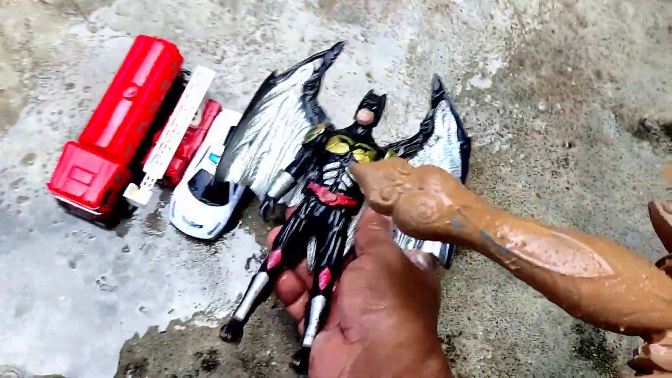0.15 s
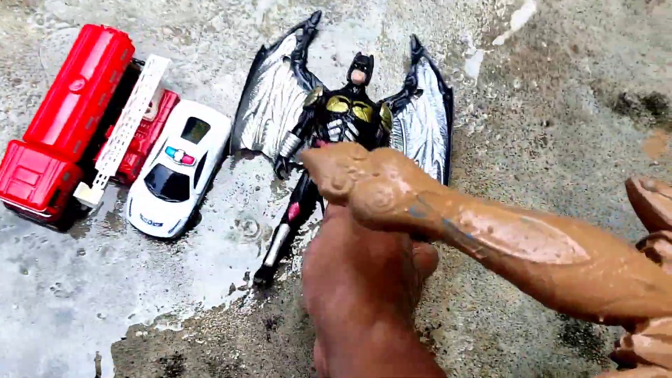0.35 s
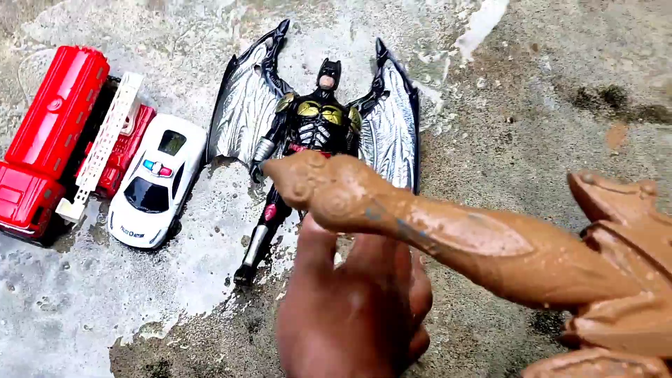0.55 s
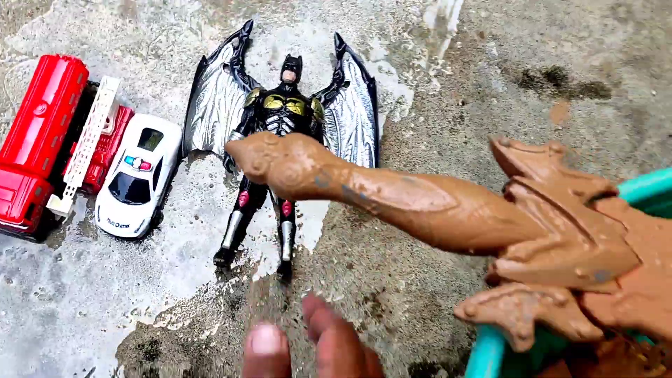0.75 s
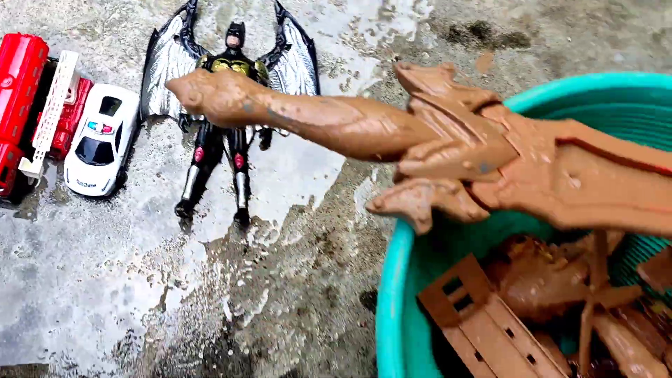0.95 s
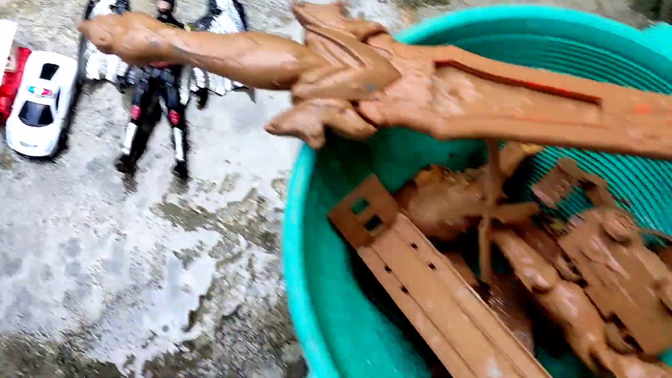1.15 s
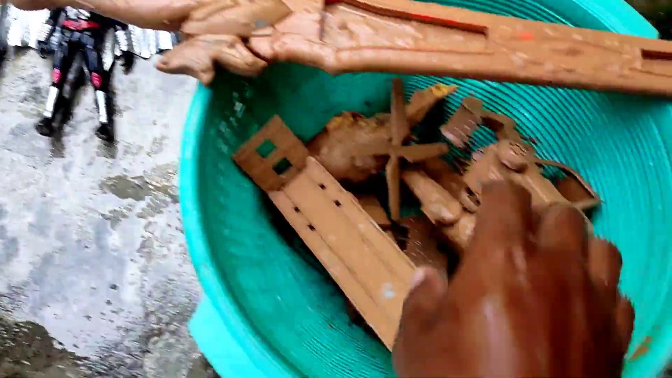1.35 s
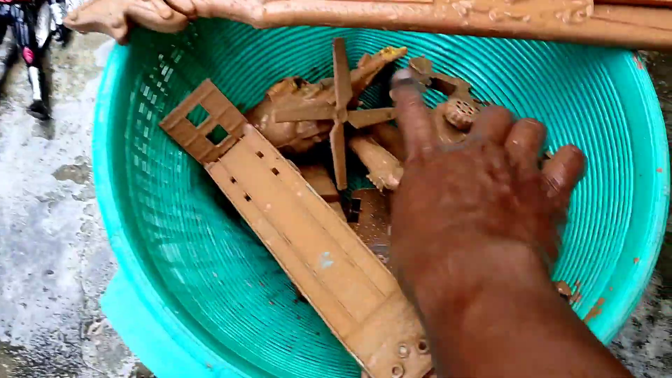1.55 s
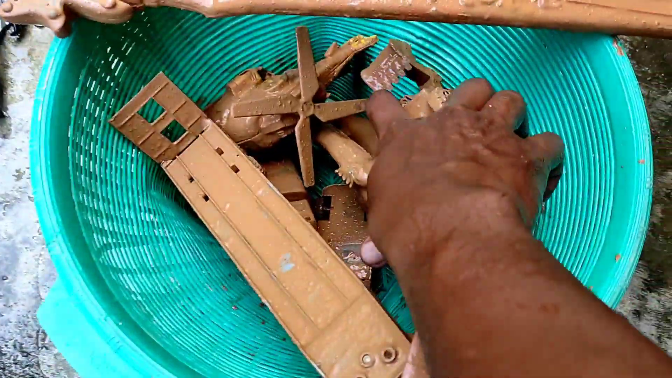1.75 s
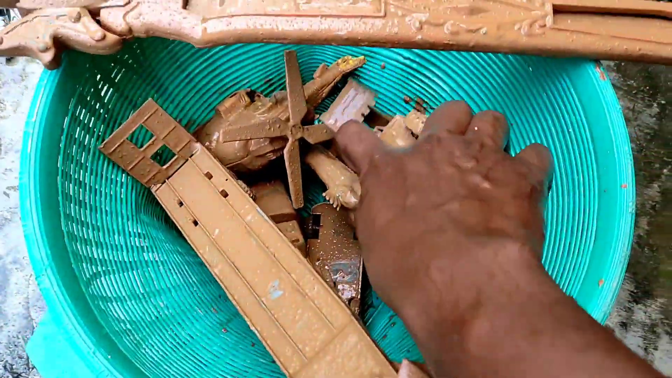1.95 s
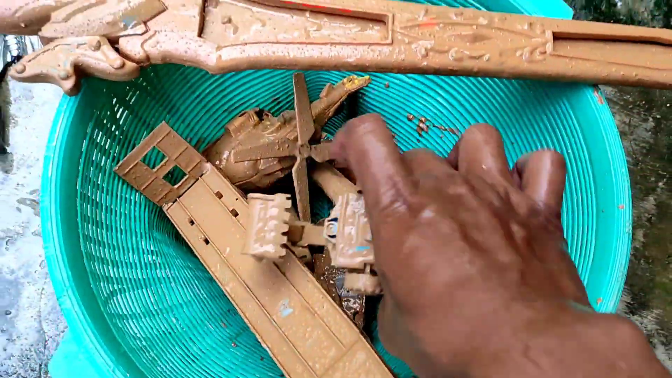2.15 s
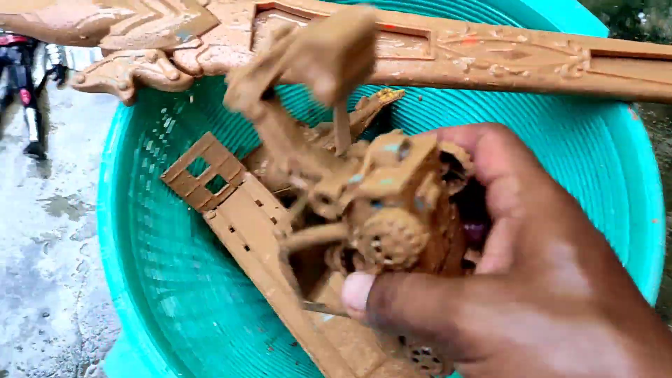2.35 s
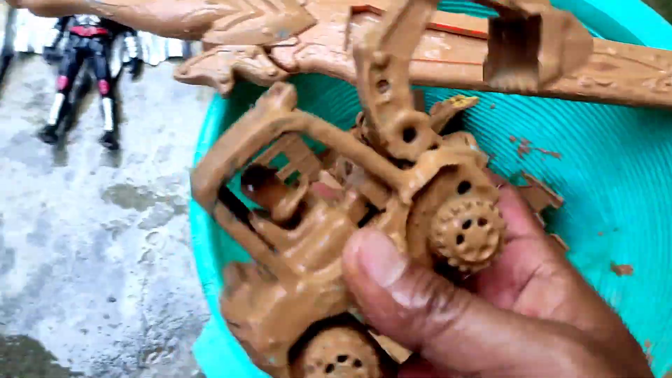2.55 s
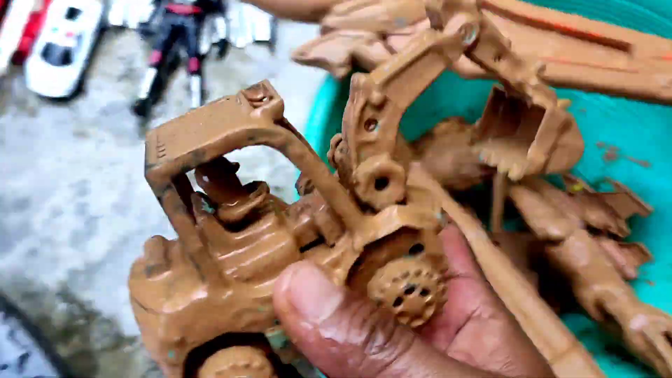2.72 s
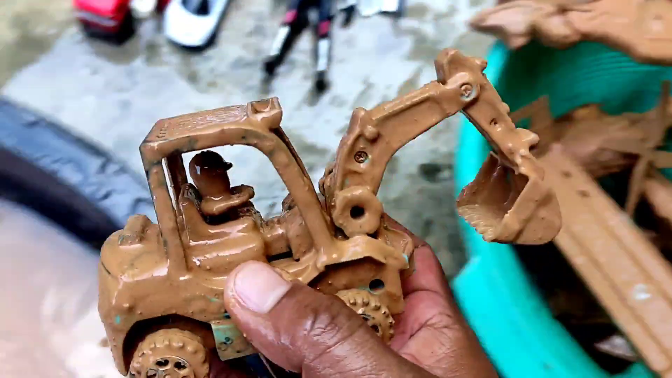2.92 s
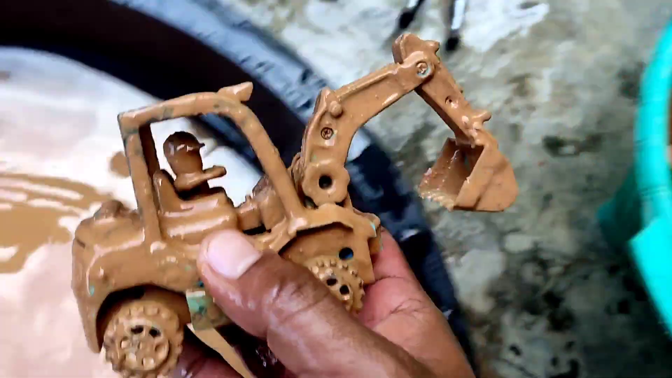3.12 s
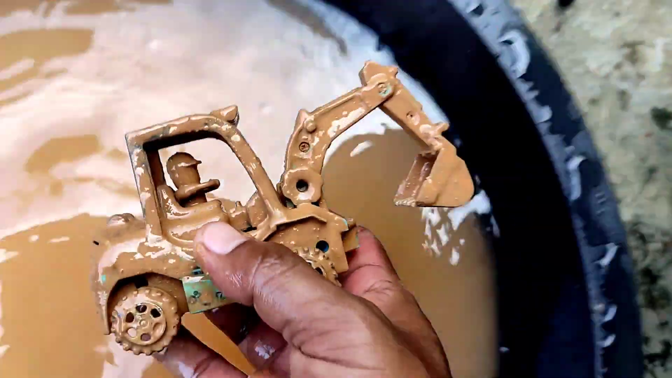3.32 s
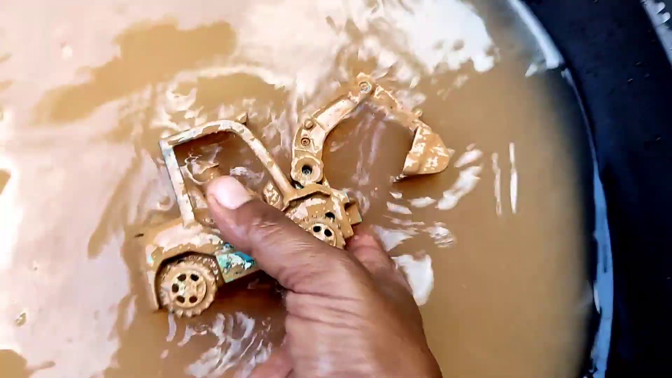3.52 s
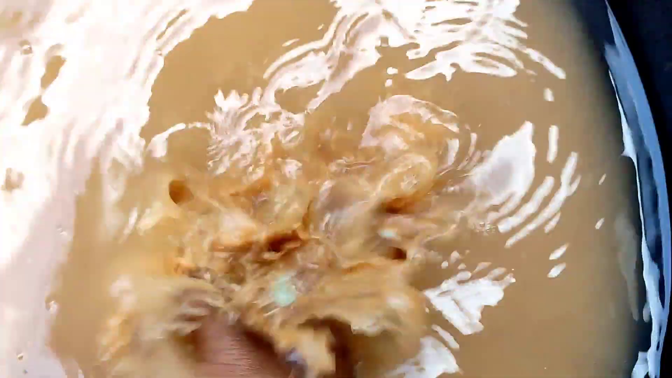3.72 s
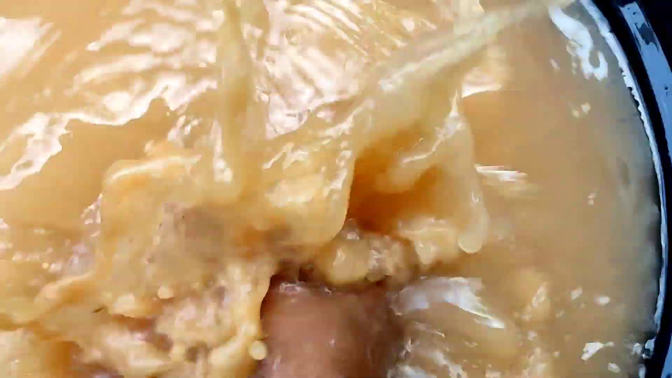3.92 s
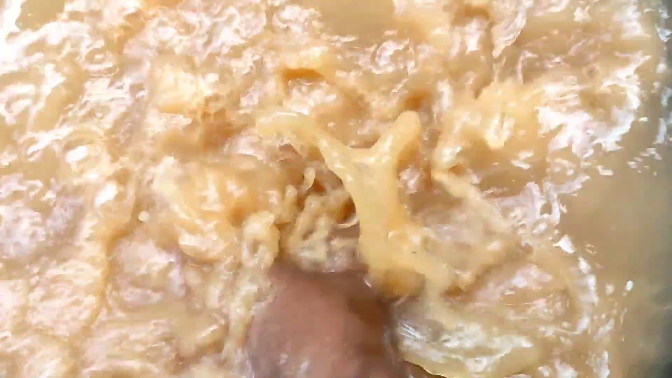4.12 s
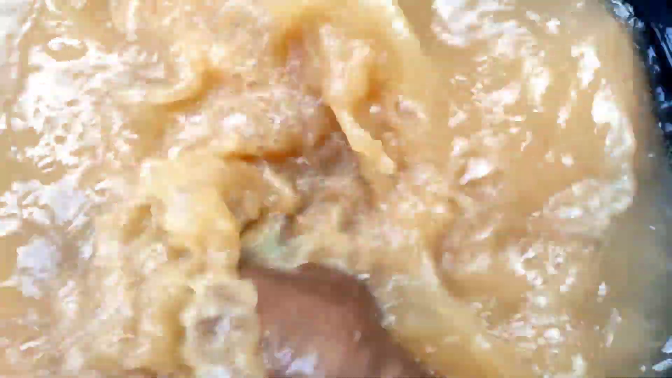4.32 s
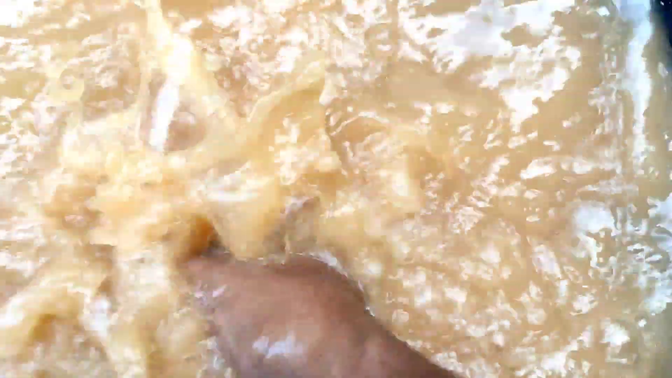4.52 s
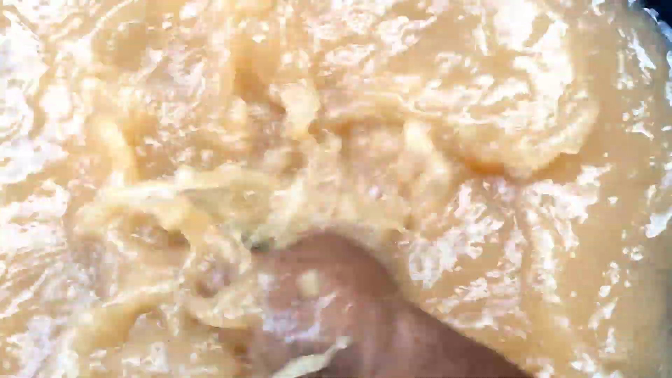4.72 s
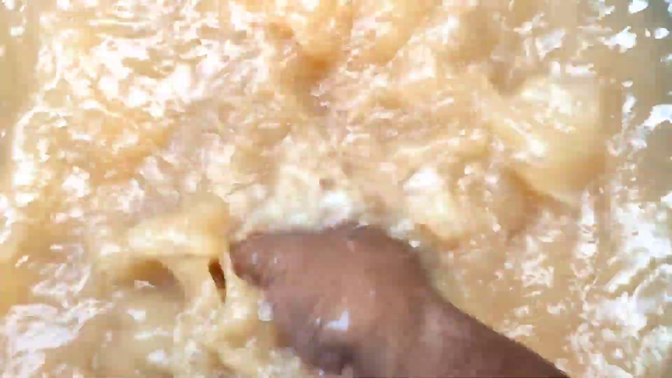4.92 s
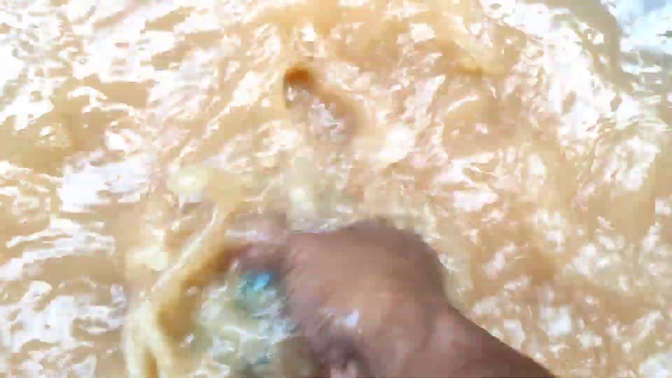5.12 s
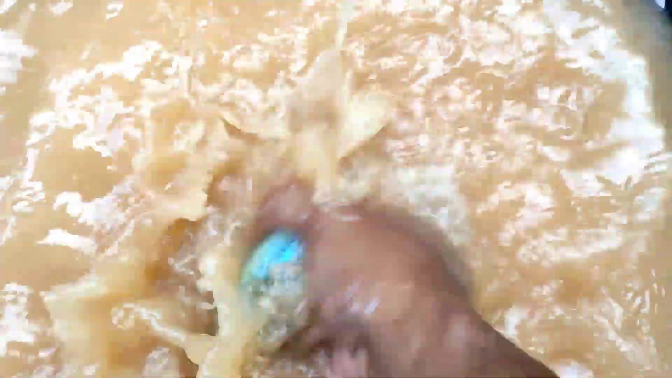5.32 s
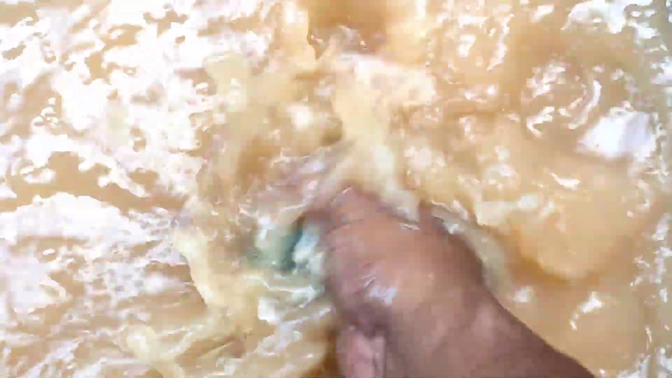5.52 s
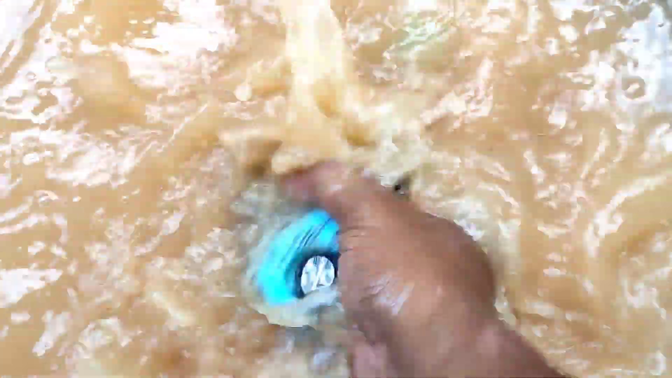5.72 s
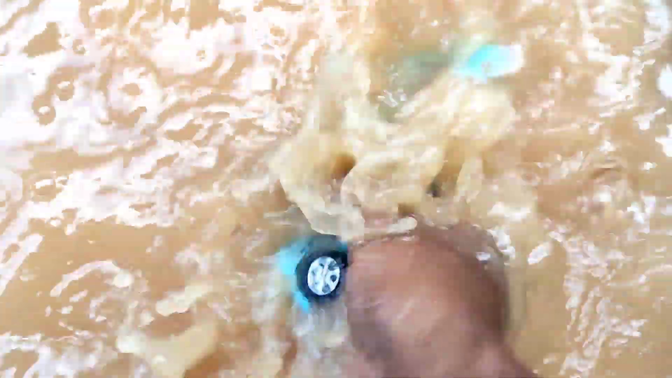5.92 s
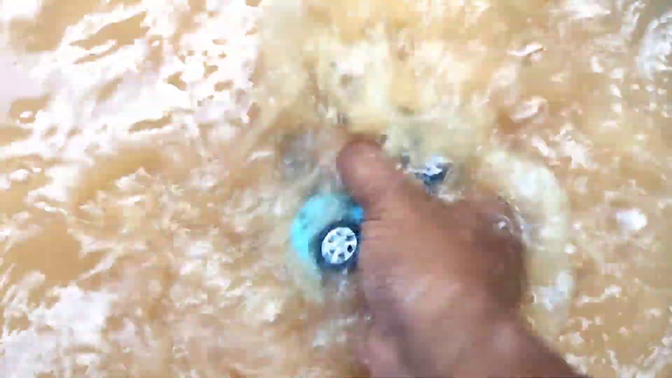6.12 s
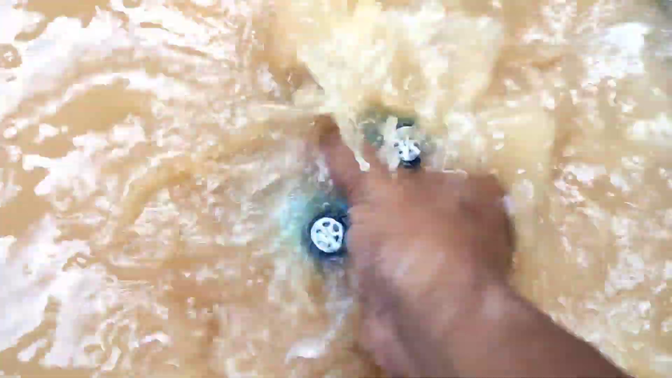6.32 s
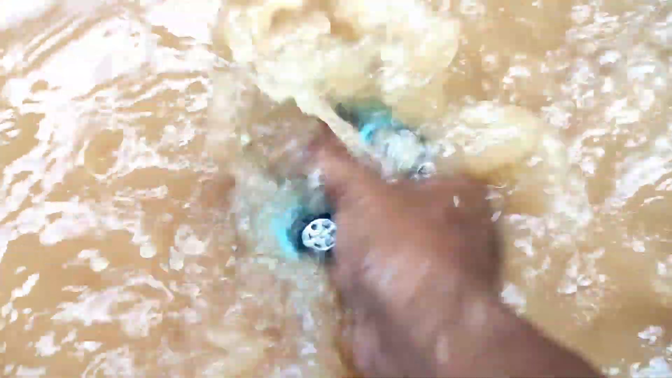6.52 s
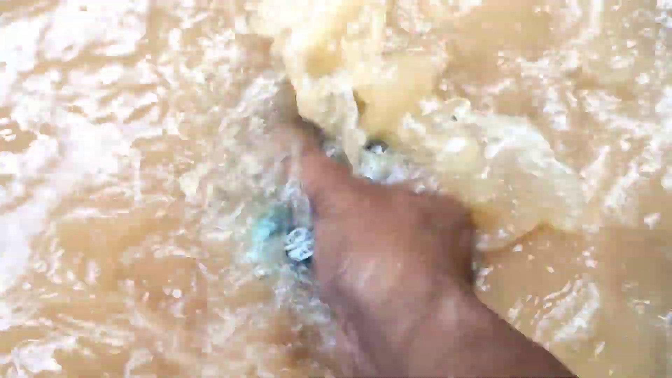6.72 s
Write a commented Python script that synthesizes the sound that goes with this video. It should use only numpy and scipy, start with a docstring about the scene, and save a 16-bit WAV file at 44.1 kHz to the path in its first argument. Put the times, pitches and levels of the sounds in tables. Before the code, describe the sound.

A faint, distant outdoor background runs throughout, with everything else close to the microphone. At the start a plastic toy scrapes softly over concrete, drops with a sharp, hollow crack at about 0.4 seconds and rocks briefly to rest. Low handling rumble comes and goes, and from 1.2 to 1.5 seconds something rubs against the microphone with a hiss and a squeak. From about 1.8 to 2.8 seconds a hand rummages in a plastic basket, toys sliding over each other with light, hollow knocks. Around 3 seconds a faint hum of air in a basin comes in, and a few drips fall near 3.6 seconds. At 3.8 seconds a toy is plunged into the water and scrubbed to and fro. Quick, uneven strokes slosh, slap the surface, gurgle with bubbles and throw spray, loud and continuous until the end, near 6.8 seconds.

```python
"""Plastic toys are washed outdoors, close to a phone. Over the distant yard, one toy is dragged along the
concrete, drops and rocks, its hollow shell ringing. The grip on the phone rumbles, something rubs on its
case with a hiss and a squeak, and a hand rummages in a plastic basket. The basin's air hums in, a few
drips fall, and at 3.8 s a muddy toy is plunged in and scrubbed to and fro: the strokes trap ringing air
bubbles, slap the surface and throw spray."""
import sys
import numpy as np
from scipy import signal
from scipy.fft import rfft, irfft
from scipy.io import wavfile
from scipy.ndimage import uniform_filter1d

SR = 44100
rng = np.random.default_rng(int(sys.argv[2]) if len(sys.argv) > 2 else 0)


def inscribe(sig):
    """Save sig as 16-bit PCM at rate SR to the path in sys.argv[1].

    A 1-D sig is mono; a 2-D sig holds one channel per row.
    Samples are clipped to [-1, 1] before scaling.
    """
    pcm = np.round(np.clip(np.atleast_2d(sig).T, -1, 1) * 32767)
    wavfile.write(sys.argv[1], SR, pcm.astype(np.int16))


N = 298116
T = np.arange(N) / SR
HZ = np.maximum(np.fft.rfftfreq(2 * N, 1 / SR), 1)

# EQ curves that colour the layers. Each row: frequency in Hz, relative level in dB.
YARD_EQ = [(40, -38), (200, -9), (275, 1), (350, -5.5), (500, -12), (620, -14), (850, -15.5), (1600, -20),
           (3000, -21.5), (6300, -24), (7400, -34), (9200, -28.5), (11500, -34.5), (15000, -34)]
DRAG_EQ = [(100, -20), (280, 16), (600, 4), (1600, -3), (3200, -4), (5000, -20), (15000, -33)]
CRACK_EQ = [(150, -21), (350, 0.5), (900, 6.5), (1400, -2), (3000, 9.5), (6000, -5), (9000, -36),
            (15000, -30)]
RUMBLE_EQ = [(20, -10), (50, -12), (100, 5), (170, 4), (260, -8), (500, -32), (1000, -56)]
HISS_EQ = [(400, -10), (1000, 4.5), (1600, 5.5), (2300, 4.5), (4000, -0.5), (7000, -7), (10000, -8.5),
           (15000, -10.5)]
THUD_EQ = [(170, -29), (400, -1.5), (750, -3.5), (1200, -4), (2000, -11.5), (3500, -15.5), (9000, -27),
           (15000, -27)]
SPRAY_EQ = [(900, -10.5), (2500, 1.5), (4000, -1), (5800, -5), (6600, -3.5), (7300, -10), (9000, -5),
            (10300, -7.5), (11500, -9.5), (12500, -8), (15500, -14.5)]
SPLASH_EQ = [(300, -23.5), (600, -2.5), (800, -12), (920, -12.5), (1090, 0), (1300, -3), (1700, -1),
             (2000, -5.5), (2500, -1.5), (3300, -34), (6000, -33)]
CHURN_EQ = [(50, -46), (170, -35), (220, -22.5), (275, -1.5), (330, -8), (392, 5.5), (470, 0), (750, -2),
            (1000, -4), (2000, -72.5)]
# Friction moves. Each row: time of full speed in seconds, build-up in seconds, level in dB.
DRAG_MOVES = [(.16, .12, -40.5), (.42, 0.025, -42)]  # toy along the ground
GRIP_MOVES = [(1.08, 0.056, -42.5), (1.74, 0.17, -40.5), (2.66, 0.045, -44), (2.83, 0.024, -37.5),
              (2.98, .04, -39), (4.0, .08, -41.5), (5.95, 0.13, -40.5), (6.74, 0.093, -44)]  # fingers on the phone
RUMMAGE_MOVES = [(1.76, 0.044, -43), (1.94, 0.028, -39), (2.03, 0.061, -34), (2.095, 0.011, -36),
                 (2.165, 0.017, -32.5), (2.215, 0.044, -31), (2.34, .03, -43), (2.48, 0.17, -45.5)]  # toy over toy
# Plastic hits. Each row: start in seconds, level in dB, treble offset in dB, leftward lean in dB
# (halved in the mix).
CONCRETE_HITS = [(0.358, -24, -16, 0), (0.367, -4.5, -7, -5), (0.372, -7, -23, -1),
                 (0.383, -10.5, -16, -11), (0.408, -27, -16, -2), (0.470, -14, -19, -6),
                 (0.474, -14, -22, -12), (0.507, -17, -31, -12), (0.545, -36, -22, 15),
                 (0.580, -25, -27, 0)]
BASKET_HITS = [(2.091, -21.5, -22, -4), (2.186, -26.5, -23, -17), (2.307, -23, -39, 2),
               (2.557, -23.5, -7, 15), (2.611, -33.5, -3.5, 4), (2.686, -23.5, -30, -7),
               (2.722, -28, -15, -4), (2.770, -32, -24, 0), (2.778, -13, -44, 0)]
# Modes of the hollow shells. Each row: pitch in Hz, level in dB, time to fall 60 dB in seconds.
DROPPED_TOY_MODES = [(407, -9, 0.22), (1170, -7, 0.062), (1450, 8, 0.025), (1620, -3, 0.07),
                     (2980, 4, 0.029), (3500, 2, 0.033), (4270, -26, 0.044)]
BASKET_TOY_MODES = [(366, -14, 0.06), (706, -2.5, 0.052), (755, 0, 0.032), (1070, 2, 0.026),
                    (1660, -2, 0.035), (1710, 0, 0.022)]
# Fader ride of the rub on the case. Each row: time in seconds, hiss level in dB, squeak level in dB.
RUB_FADERS = [(1.19, -52, -65), (1.23, -41.5, -28), (1.38, -34.5, -32), (1.44, -35.5, -21),
              (1.49, -43, -33), (1.52, -65, -64)]
# Single pings. Each row: peak time in seconds, pitch in Hz, level in dB, length in seconds.
RUB_SLIPS = [(1.398, 1680, -22, 0.0095), (1.421, 1674, -19, .005), (1.431, 1640, -19.5, 0.00517),
             (1.461, 1690, -27, .005)]
BIG_BUBBLES = [(3.899, 1120, -13, 0.0073), (3.928, 1200, -5, 0.003), (3.97, 1116, -3.5, 0.0062),
               (4.033, 1880, -4, 0.0039), (4.04, 1460, -9.5, 0.0031), (4.043, 1047, -4, 0.0064),
               (4.15, 1170, -7, 0.0029), (4.505, 407, -8, 0.0052), (4.627, 1680, -13.5, 0.0032),
               (4.644, 1190, -2.5, 0.005), (4.747, 457, -14, 0.0062), (4.846, 400, -13.5, 0.011),
               (4.873, 1130, -10, 0.0025), (5.007, 1815, -11.5, 0.0029), (5.045, 397, -12, 0.0086),
               (5.047, 537, -17.5, 0.0087), (5.218, 2370, -9, 0.004), (5.477, 1450, -9.5, 0.0033),
               (5.485, 1760, -12, 0.005), (5.618, 1320, -13, 0.0042), (5.744, 1490, -5, 0.0018),
               (5.804, 1790, -9.5, 0.0027), (5.939, 1065, -7.5, 0.0041), (5.991, 1285, -7.5, 0.0041),
               (5.996, 1740, -8, 0.0029), (6.156, 1790, -9, 0.0033), (6.203, 396, -7.5, 0.012),
               (6.252, 720, -10.5, 0.0069), (6.271, 757, -8, 0.0066), (6.304, 397, -7, 0.015),
               (6.34, 261, -15, 0.019), (6.533, 1290, -15.5, 0.0037), (6.615, 435, -9.5, 0.0059),
               (6.642, 380, -9.5, 0.017), (6.727, 1616, -9.5, 0.0041)]
# Air resonances of the basin. Each row: centre in Hz, width in Hz, level in dB.
BASIN_MODES = [(268.7, 38, -3.5), (598, 160, -17), (1390, 1100, -27.5)]
# Hits on the water. Each row: start in seconds, level in dB.
HAND_DRIPS = [(3.558, -26.5), (3.582, -21), (3.623, -19), (3.651, -22), (3.667, -23), (3.697, -22),
              (3.705, -27.5)]
WATER_SLAPS = [(3.836, -11), (3.925, -9), (3.979, -16), (4.035, -15), (4.145, -14), (4.204, -14.5),
               (4.501, -12.5), (4.842, -10.5), (5.215, -17), (5.231, -16.5), (5.414, -15), (5.443, -14.5),
               (5.927, -14), (5.991, -21.5), (6.122, -9), (6.249, -27), (6.531, -22)]
# Air pockets that shrink or grow. Each row: start in seconds, length in seconds, first pitch in Hz,
# last pitch in Hz, level in dB.
AIR_POCKETS = [(3.601, 0.0058, 3920, 3100, -18), (3.647, 0.0084, 2610, 1890, -16),
               (3.674, 0.0051, 780, 560, -22.5), (3.942, 0.031, 463, 1080, -11.5),
               (3.973, 0.0147, 1266, 1840, -17), (4.038, 0.0187, 1430, 2350, -13.5),
               (6.176, 0.0405, 255, 326, -9), (6.35, 0.025, 917, 1260, -15.5)]
# Hand strokes through the water. Each row: time of full speed in seconds, build-up in seconds,
# then the levels of splash, deep churn and spray in dB.
SCRUB_STROKES = [(3.845, 0.0097, -19.5, -47, -19), (3.926, 0.024, -13, -15, -19.5),
                 (4.039, 0.018, -14.5, -23.5, -24), (4.158, 0.021, -13, -29, -32),
                 (4.22, .008, -21.5, -21.5, -35), (4.295, 0.056, -17.5, -29, -35),
                 (4.353, 0.083, -17, -22.5, -21.5), (4.439, 0.016, -14, -23.5, -26),
                 (4.508, 0.019, -15.5, -26.5, -20.5), (4.61, 0.044, -19.5, -25, -53),
                 (4.708, 0.031, -18, -35, -25), (4.845, 0.069, -21.5, -25, -25),
                 (5.032, 0.04, -17, -20, -28), (5.231, 0.015, -22.5, -39, -26.5),
                 (5.465, 0.014, -17, -51, -25.5), (5.565, .025, -17.5, -58, -31),
                 (5.638, 0.066, -19, -32, -24), (5.745, .008, -16, -22, -33),
                 (5.821, 0.044, -14.5, -27, -21), (5.94, 0.036, -16, -19.5, -24.5),
                 (5.996, 0.012, -14, -22.5, -22), (6.065, 0.024, -16.5, -22.5, -29.5),
                 (6.125, 0.017, -10.5, -22, -18.5), (6.271, 0.075, -17, -17, -23),
                 (6.36, 0.079, -18, -29, -24), (6.438, 0.088, -17.5, -17.5, -24.5),
                 (6.533, 0.036, -17.5, -21.5, -27), (6.64, 0.092, -18, -15, -25),
                 (6.76, 0.054, -14.5, -19.5, -18)]
# How each water layer settles. Each row: lag in seconds, time to fall by 1/e in seconds, level of the
# wash between strokes in dB.
SPLASH_SETTLE = (-0.0049, 0.063, -26)
CHURN_SETTLE = (0.0024, 0.073, -35)
SPRAY_SETTLE = (0.00033, 0.036, -36.5)
# Microphone port resonances, left then right. Each row: centre in Hz, width in Hz, lift in dB.
MIC_PORTS = [(1706, 334, 11.85), (8930, 1020, 11.62)]


def undb(db):
    return 10 ** (np.asarray(db) / 20)


def unit(x):
    """Scale to rms 1."""
    return x / np.sqrt(np.mean(x ** 2))


def pan(left_db):
    """Stereo gains, the left louder by left_db."""
    return undb(np.array([[left_db], [-left_db]]) / 2)


def add(out, s, sound):
    """Mix a short stereo sound in at s seconds."""
    i = max(int(s * SR), 0)
    out[:, i:i + sound.shape[1]] += sound[:, :max(N - i, 0)]


def filtered(x, response):
    """Apply a frequency response."""
    return irfft(rfft(x, 2 * N) * response)[..., :N]


def resonance(hz, width_hz):
    """Band-pass response, gain 1 at the centre."""
    return 1 / (1 + 1j * (HZ / hz - hz / HZ) * hz / width_hz)


def eq(x, curve, size=1024):
    """Minimum-phase EQ of unit energy."""
    hz, db = np.transpose(curve)
    grid = np.maximum(np.fft.rfftfreq(4 * size, 1 / SR), 1)
    cepstrum = irfft(np.log(undb(np.interp(np.log(grid), np.log(hz), db))))
    cepstrum[1:2 * size] *= 2
    cepstrum[2 * size:] = 0
    impulse = irfft(np.exp(rfft(cepstrum)))[:2 * size]
    return signal.oaconvolve(x, impulse[None] / np.linalg.norm(impulse))[:, :N]


def noise(mono_below_hz):
    """Stereo noise, narrow in the bass and wide on top."""
    mid, side = rng.standard_normal((2, N))
    alike = 1 / (1 + (HZ / mono_below_hz) ** 2)
    mid, side = filtered(mid, np.sqrt(1 + alike)), filtered(side, np.sqrt(1 - alike))
    return unit(np.array([mid + side, mid - side]))


def flicker(x, depth_db):
    """Narrow bands swell and fade from moment to moment."""
    spectra = signal.stft(x, nperseg=1024)[2]
    patches = uniform_filter1d(rng.standard_normal(spectra.shape), size=6, axis=1)
    patches = uniform_filter1d(patches, size=4, axis=2)
    gain = unit(undb(depth_db * np.tanh(unit(patches))))
    return signal.istft(spectra * gain, nperseg=1024)[1][:, :N]


def reflect(x, t60, wet_db):
    """Add a dense tail of nearby reflections."""
    t = T[:SR // 3]
    tail = noise(900)[:, :len(t)] * undb(-60 * t / t60) * (t > .002)
    tail /= np.sqrt(np.sum(tail ** 2) / 2)
    return x + undb(wet_db) * signal.oaconvolve(x, tail, axes=1)[:, :N]


def swells(moves, fall_s, lag_s=0):
    """Envelope of overlapping moves: each builds and dies away, and their powers add."""
    grid = T[::40]
    power = np.zeros(len(grid))
    for s, build_s, db in moves:
        t = grid - s - lag_s
        fade = np.minimum(np.maximum(-t / build_s, t / fall_s), 20)
        power += undb(db) ** 2 * np.exp(-2 * fade)
    return np.interp(T, grid, np.sqrt(power))


def crackle(per_s, spread_db, grain_s):
    """Tiny noise grains of uneven strength."""
    onsets = rng.random(N) < per_s / SR
    sizes = onsets * undb(spread_db * np.minimum(rng.standard_exponential(N), 4))
    power = signal.lfilter([1], [1, -np.exp(-2 / (grain_s * SR))], sizes ** 2)
    return unit(np.sqrt(power) * noise(1560))


def bursts(rows, t60, rise_s):
    """A short, panned noise hit for each row."""
    envelope, t = np.zeros((2, N)), T[:SR // 8]
    shape = undb(-60 * t / t60) * (1 - np.exp(-t / rise_s))
    for s, db, left_db in rows:
        add(envelope, s, pan(left_db) * undb(db) * shape / shape.max())
    return envelope * noise(1300)


def pings(rows, rise, scatter_db):
    """Tones that swell and die, high ones spread wider; rise bends them up like a surfacing bubble."""
    out = np.zeros((2, N))
    for (s, hz, db, length), (turn, place) in zip(rows, rng.random((len(rows), 2))):
        swell_s = max(length, 1 / SR) / np.sqrt(6)
        t = T[:int(9 * swell_s * SR) + 2]
        age = t / swell_s
        side = (2 * place - 1) * min(hz / 2000, 1)
        phase = hz * (t + rise * swell_s * (age - 1) ** 2 / 2) + turn + np.array([[side], [0]]) / 4
        envelope = undb(db) * age * np.exp(1 - age)
        add(out, s - swell_s, pan(scatter_db * side) * envelope * np.sin(2 * np.pi * phase))
    return out


def ping_cloud(per_s, low_hz, high_hz, cycles, spread_db, scatter_db):
    """Many pings of random pitch and place, a few standing out."""
    when, size, life, strength = rng.random((int(per_s * N / SR), 4)).T
    hz = low_hz * (high_hz / low_hz) ** size
    rows = np.column_stack([when * N / SR, hz, spread_db * strength ** 2, cycles * (.5 + life) / hz])
    return unit(pings(rows, rise=0.013, scatter_db=scatter_db))


def yard():
    """A distant outdoor bed whose colour flickers."""
    return flicker(unit(eq(noise(910), YARD_EQ)), depth_db=3.5) * undb(-48.5)


def toy_drag():
    """Plastic scrapes grainily over the ground."""
    return unit(eq(crackle(295, 1.6, 0.0062), DRAG_EQ)) * swells(DRAG_MOVES, fall_s=0.19)


def plastic_hits(hits, modes, clatter_eq, ring_db, clatter_db, tick_db, t60, rise_s):
    """Every blow on hollow plastic gives a bright tick, a short clatter and the ring of the shell."""
    ring, t = np.zeros((2, N)), T[:SR // 4]
    for s, db, _, lean_db in hits:
        shell = 0
        for hz, mode_db, mode_t60 in modes:
            phase = hz * t + rng.random((2, 1)) * min(hz / 3000, 1)
            shell += undb(mode_db - 60 * t / mode_t60) * np.sin(2 * np.pi * phase)
        add(ring, s, undb(db + ring_db) * pan(lean_db / 2) * shell)
    clatter = bursts([(s, db, lean_db / 2) for s, db, _, lean_db in hits], t60, rise_s)
    tick = bursts([(s, db + treble_db, 0) for s, db, treble_db, _ in hits], 0.02, rise_s)
    return ring + undb(clatter_db) * eq(clatter, clatter_eq) + undb(tick_db) * eq(tick, SPRAY_EQ)


def toy_drop():
    """The toy cracks onto the concrete and rocks to rest."""
    return plastic_hits(CONCRETE_HITS, DROPPED_TOY_MODES, CRACK_EQ,
                        ring_db=-17.5, clatter_db=-11, tick_db=0.5, t60=0.022, rise_s=0.0016)


def grip_rumble():
    """The hand rumbles through the phone, more as the fingers shift."""
    gain = np.hypot(swells(GRIP_MOVES, fall_s=0.052), undb(-51.5))
    return unit(eq(noise(180), RUMBLE_EQ)) * gain * pan(8.7) * undb(-2)


def case_rub():
    """Friction on the phone's case hisses and squeaks, with a chirp at each slip."""
    times, *faders = np.transpose(RUB_FADERS)
    hiss_gain, squeak_gain = (undb(np.interp(T, times, db, left=-120, right=-120)) for db in faders)
    friction = unit(eq(crackle(2500, 0.73, 0.0014), HISS_EQ))
    hiss = reflect(friction, t60=0.038, wet_db=-0.5) * hiss_gain
    squeak = unit(filtered(noise(500), resonance(1733, 140) ** 2)) * squeak_gain * undb(-12.5)
    slips = pings(RUB_SLIPS, rise=0, scatter_db=2)
    return hiss + (squeak + slips) * pan(3.5)


def basket_rummage():
    """Toys slide over each other; each catch rings a hollow shell for a few cycles."""
    catches = ping_cloud(per_s=300, low_hz=397, high_hz=1960, cycles=6.12, spread_db=15, scatter_db=-9)
    scrape = crackle(700, 2.6, 0.0041) + undb(-9) * catches
    return unit(eq(scrape, THUD_EQ)) * swells(RUMMAGE_MOVES, fall_s=0.026)


def basket_knocks(rattle_s=.004, rattle_db=-11):
    """Toys knock together, and loose parts strike again more softly after each blow."""
    rattles = [(s + rattle_s * (.5 + rng.random()), db + rattle_db, treble_db, lean_db)
               for s, db, treble_db, lean_db in BASKET_HITS]
    return plastic_hits(list(BASKET_HITS) + rattles, BASKET_TOY_MODES, THUD_EQ,
                        ring_db=-12.5, clatter_db=-13.5, tick_db=-2, t60=0.013, rise_s=0.0024)


def basin_hum():
    """The air in the basin hums with the background once the phone is overhead."""
    hollow = sum(undb(db) * resonance(hz, width) ** 2 for hz, width, db in BASIN_MODES)
    overhead = np.interp(T, [2.9, 3.6], [0, 1])
    return unit(filtered(noise(2600), hollow)) * overhead * undb(-44.5)


def glugs():
    """An air pocket changes size while it rings, so its note slides."""
    out = np.zeros((2, N))
    for s, length, first_hz, last_hz, db in AIR_POCKETS:
        hz = np.geomspace(first_hz, last_hz, int(length * SR))
        envelope = undb(db) * signal.windows.tukey(len(hz), .5)
        add(out, s, pan(0) * envelope * np.sin(2 * np.pi * np.cumsum(hz) / SR))
    return out


def scrubbing(plunge_s=3.83, rise_s=0.012):
    """Envelopes of splash, churn and spray: from the plunge on, a swell per stroke over a steady wash."""
    s, build_s, *levels = np.transpose(SCRUB_STROKES)
    in_water = np.clip((T - plunge_s) / rise_s, 0, 1)
    return [in_water * np.hypot(swells(zip(s, build_s, db), fall_s, lag_s), undb(wash_db))
            for db, (lag_s, fall_s, wash_db) in zip(levels, (SPLASH_SETTLE, CHURN_SETTLE, SPRAY_SETTLE))]


def water():
    """Drips fall from the hand, then strokes stir up bubbles and spray; the basin wall throws them back."""
    splash_gain, churn_gain, spray_gain = scrubbing()
    # bubbles in three sizes: the smaller, the higher they ring
    gulps = ping_cloud(per_s=190, low_hz=227.5, high_hz=827, cycles=3.66, spread_db=6.5, scatter_db=-3)
    small = ping_cloud(per_s=800, low_hz=661, high_hz=3196, cycles=5.534, spread_db=6.5, scatter_db=10.5)
    fizz = ping_cloud(per_s=900, low_hz=2396, high_hz=14360, cycles=13, spread_db=6.5, scatter_db=9.5)
    churn = unit(eq(gulps + noise(900), CHURN_EQ)) * churn_gain * undb(-2.5)
    froth = flicker(crackle(710, 1.3, 0.0036), depth_db=4.5)
    splash = unit(eq(small + froth, SPLASH_EQ)) * splash_gain * undb(-5.5)
    droplets = unit(crackle(450, 2.5, 0.0016) + undb(-3) * fizz) * spray_gain * undb(-4)
    slaps = bursts([(s, db, 0) for s, db in WATER_SLAPS], t60=0.014, rise_s=0.0023)
    drips = bursts([(s, db, 0) for s, db in HAND_DRIPS], t60=0.013, rise_s=0.003)
    spray = eq(flicker(droplets + undb(-7.5) * (slaps + drips), depth_db=6), SPRAY_EQ)
    # spray leaves the surface, so the near wall reflects it strongly
    spray = undb(-1.5) * reflect(spray * pan(-3), t60=0.051, wet_db=-0.5)
    smacks = eq(undb(-8) * slaps + undb(-10) * drips, THUD_EQ)
    big_gulps = pings(BIG_BUBBLES, rise=0.0035, scatter_db=-11) + glugs()
    return spray + reflect(churn + splash + smacks + big_gulps, t60=0.12, wet_db=-8.5)


def scene():
    """The mix: the plastic sounds share one short tail of reflections."""
    washing = water()
    toys = toy_drag() + toy_drop() + basket_rummage() + basket_knocks()
    return yard() + reflect(toys, t60=0.21, wet_db=-11) + grip_rumble() + case_rub() + basin_hum() + washing


def record(dry):
    """Each port resonates and the left lies further off; bass is cut, peaks are rounded, the top is cut."""
    left_lag_s, low_cut_hz, top_hz = .00017, 38, 15600
    left, right = (1 + (undb(db) - 1) * resonance(hz, width) for hz, width, db in MIC_PORTS)
    left *= np.exp(-2j * np.pi * HZ * left_lag_s)
    low_cut = (1j * HZ / (1j * HZ + low_cut_hz)) ** 2
    heard = filtered(dry, low_cut * np.array([left, right]))
    rounded = heard / (1 + heard ** 4) ** (1 / 4)
    return signal.sosfilt(signal.ellip(8, .2, 70, top_hz, fs=SR, output="sos"), rounded)


dry = scene()
out = record(dry)
inscribe(out)
```